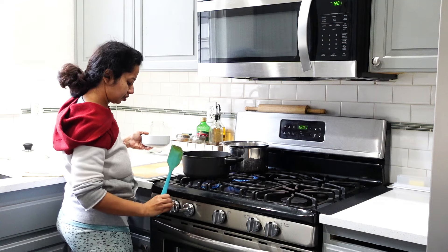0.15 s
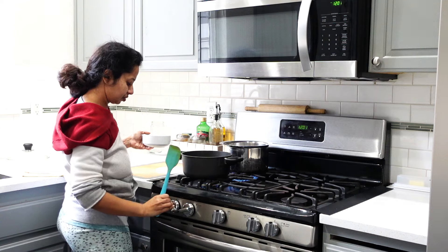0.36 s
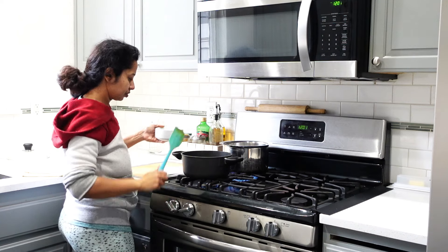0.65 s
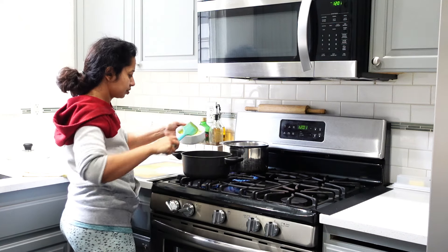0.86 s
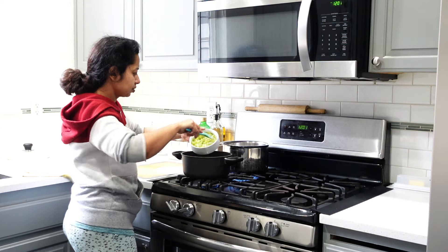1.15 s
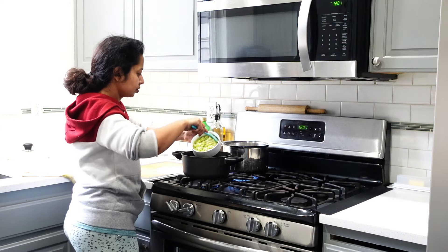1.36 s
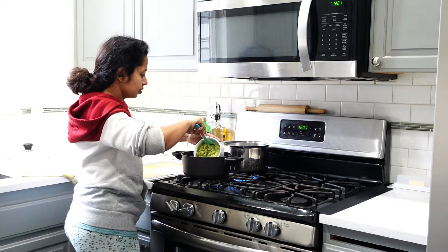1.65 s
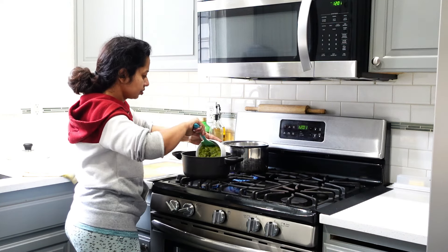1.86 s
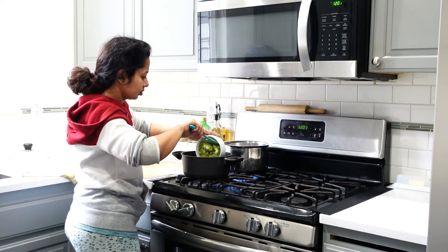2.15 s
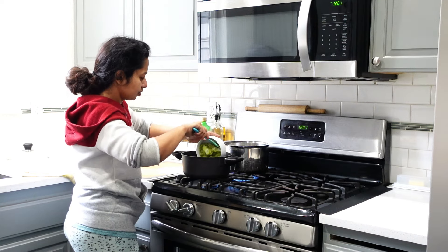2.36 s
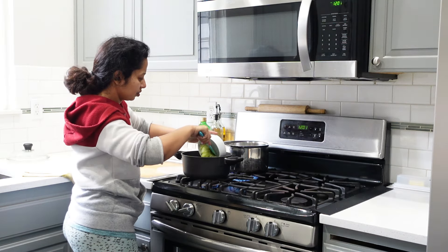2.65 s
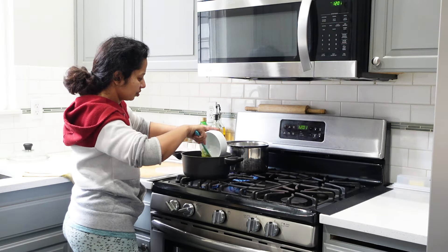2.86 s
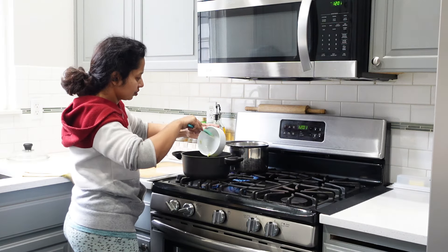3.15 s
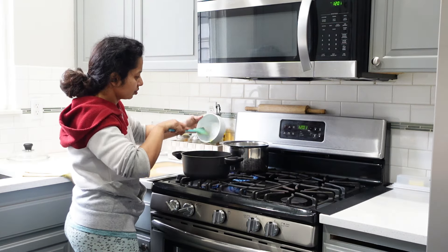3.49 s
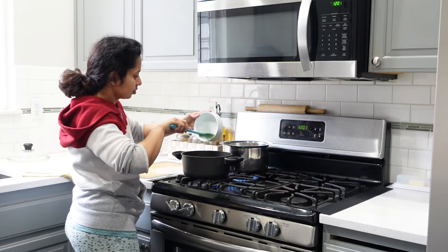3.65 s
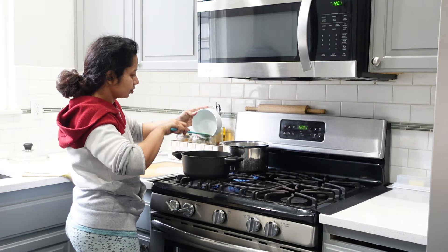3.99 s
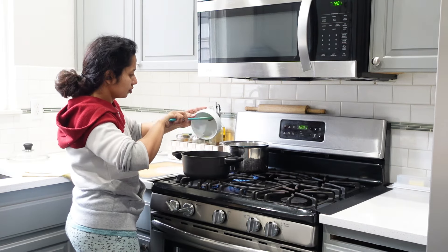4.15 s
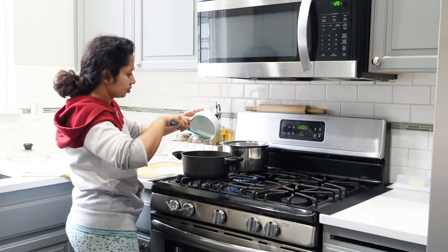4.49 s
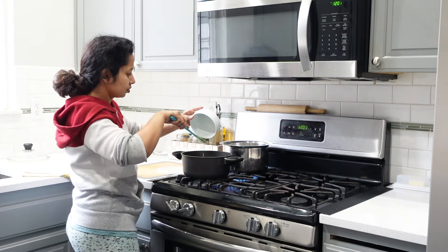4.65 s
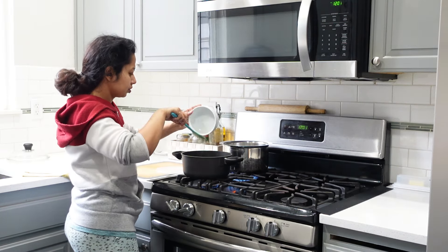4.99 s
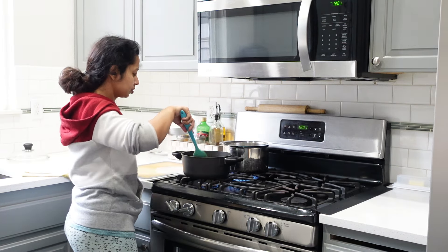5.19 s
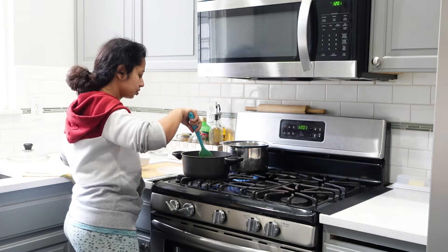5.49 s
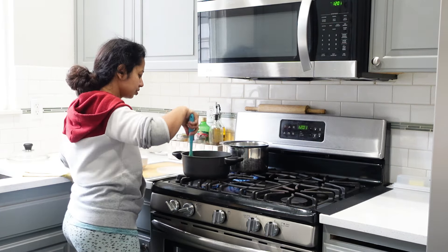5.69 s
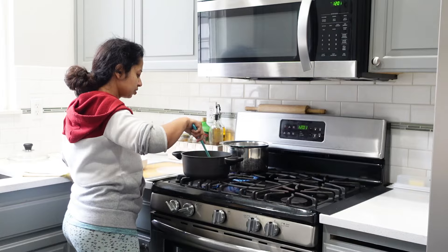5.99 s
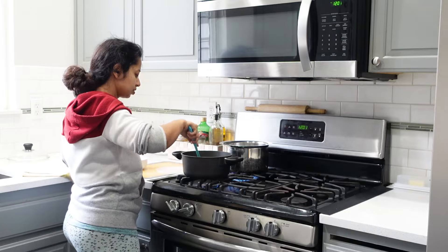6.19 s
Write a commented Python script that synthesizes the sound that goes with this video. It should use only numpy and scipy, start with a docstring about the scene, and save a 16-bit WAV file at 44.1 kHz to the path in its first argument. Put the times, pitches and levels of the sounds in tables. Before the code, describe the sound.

A pot of hot oil on a stove is heard in stereo from a few steps away in a tiled kitchen with short, close reflections. From 0 to 2.5 s the oil simmers thinly, with irregular bright steam spits and sharp snaps, strongest in the first 1.5 s and slowly getting duller. A low appliance hum stops at about 0.2 s; a very faint low murmur and drone remain beneath. At about 2.57 s vegetable paste lands and the level drops abruptly for an instant. The sputter thins, and from 2.7 to 3.3 s a dense, bubbling fizz builds, ringing in the pot with tiny pips. It eases gradually until 5.2 s. Then a rubber spatula rubs the pot and stirring lifts the sizzle brighter and fuller, with a spit at 5.6 s, a rub and soft bump near 5.9 s, and hissing swells until the end at about 6.3 s.

```python
"""Hot oil sputters in a pot on a gas stove, heard from across a tiled kitchen: steam spits are pitched noise puffs in spray.
Vegetable paste is scraped in; the sputter thins out and a dense fizz of random pops builds in the pot's resonances,
swelling when it is stirred. Snaps, short ringing pips, swells of bubbling and hissing, spatula rubs and bumps join in.
A low noise murmur and a narrow-band drone lie beneath; a low appliance hum sounds for the first moment only."""
import sys
import numpy as np
from scipy import signal
from scipy.fft import rfft, irfft, next_fast_len
from scipy.io import wavfile
from scipy.ndimage import map_coordinates

SR = 44100
rng = np.random.default_rng(int(sys.argv[2]) if len(sys.argv) > 2 else 0)


def persist_wave(psi):
    """Save psi, clipped to +-1, as 16-bit WAV."""
    counts = np.round(np.clip(psi, -1, 1) * 32767).astype(np.int16)
    wavfile.write(sys.argv[1], SR, np.atleast_2d(counts).T)


N = 279241
TIME = np.arange(N) / SR
SIZE = next_fast_len(N + SR // 2)
FREQ = np.maximum(np.arange(SIZE // 2 + 1) * SR / SIZE, 1)

SPOTS = 3   # sounding places in the pot
PASTE_IN_S, SPREAD_S = 2.566, 0.79   # the paste lands, then spreads over the hot base
# Resonances of the pot and the air in it. Each row: pitch in Hz, width in Hz,
# boost in dB for the bare oil, mean boost in dB for the paste.
POT_MODES = [(593, 31, 0, 6), (702, 21.5, 6.5, 18), (848, 19, -3.5, 11), (927, 44, 6, 1.5),
             (1342, 40.5, 13, 13), (1570, 99, -0.5, 2.5), (1937, 79, -2, 10), (2097, 48, 8, 0.5),
             (2567, 33, 10, 9), (2912, 38, 4.5, 2), (3080, 56, -2, 0.5), (3420, 43, 8.5, -0.5),
             (3900, 70, 1, 9), (4710, 30, 3, 1), (5480, 110, 4.5, 6), (5870, 150, 6, 2.5)]


def from_db(db):
    """Decibels to gain."""
    return 10 ** (np.asarray(db) / 20)


def rms_one(x):
    """Scale to unit rms."""
    return x / np.sqrt(np.mean(x ** 2) + 1e-20)


def in_time(rows):
    """Each column of a curve, at every sample."""
    s, *columns = np.transpose(rows)
    return [np.interp(TIME, s, c) for c in columns]


def at_hz(points, hz=FREQ):
    """Read a spectrum on a log-frequency axis."""
    f, value = np.transpose(points)
    return np.interp(np.log(hz), np.log(f), value)


def filtered(x, response):
    """Apply a frequency response."""
    return irfft(rfft(np.float32(x), SIZE) * np.complex64(response), SIZE)[..., :N]


def resonance(hz, width_hz):
    """Response of one damped mode, 1 on top."""
    return 1 / (1 + 1j * (FREQ ** 2 - hz ** 2) / (FREQ * width_hz))


def drift(rate):
    """Slow chance with spread 1, wandering up to rate times a second."""
    step = 50   # samples per slow value
    r = np.exp(-2 * np.pi * step * rate / SR)
    noise = rng.standard_normal(N // step + 502)
    slow = rms_one(signal.lfilter([1], [1, -2 * r, r * r], noise)[500:])
    return np.interp(np.arange(N) / step, np.arange(len(slow)), slow)


def until(s):
    """1 up to a moment, then 0 within a few milliseconds."""
    return np.clip((s - TIME) / .003 + .5, 0, 1)


def ramp(start_s, length_s):
    """0 before a moment, then rising evenly to 1."""
    return np.clip((TIME - start_s) / length_s, 0, 1)


def swell(s, width_s):
    """Bell-shaped rise and fall around a moment."""
    return np.exp(-.5 * ((TIME - s) / width_s) ** 2)


def pops(per_s, spread_db):
    """Tiny bubbles of uneven size burst at random moments, per_s at each spot in the pot."""
    born = rng.random((SPOTS, N)) < per_s / SR
    sizes = from_db(spread_db * np.minimum(rng.exponential(1, N), 4))
    signs = rng.choice([-1, 1], (SPOTS, N))
    return rms_one(sizes * signs * born)


def clustered(x, spread_db, rate, count=13):
    """Bubbles of like size burst in clusters, so each narrow band flares on its own."""
    centres_hz = np.geomspace(550, 13500, count)
    place = np.float32(np.interp(np.log(FREQ), np.log(centres_hz), np.arange(count)))
    spectrum, out = rfft(np.float32(x), SIZE), 0
    for k in range(count):
        band = irfft(spectrum * np.maximum(1 - np.abs(place - k), 0), SIZE)[:, :N]
        flare = np.float32(rms_one(from_db(spread_db * drift(rate))))
        out = out + band * flare
    return out


def wavering(x, share, rate):
    """Steam and moving food shift the pot's resonances slightly up and down: playback speed drifts."""
    place = np.arange(N) + share * np.cumsum(drift(rate))
    return np.array([map_coordinates(spot, [place], order=3, mode="mirror") for spot in x])


def pot_response():
    """The nearly empty pot lifts the sound of the oil at its resonances."""
    return np.prod([1 + (from_db(db) - 1) * resonance(hz, width_hz)
                    for hz, width_hz, db, _ in POT_MODES], axis=0)


def oil():
    """Thin simmer of the bare oil: dense pops in the pot, mostly smothered once the paste lands."""
    # Simmer spectrum ahead of the pot. Each row: frequency in Hz, relative density in dB per Hz.
    oil_colour = [(110, -33), (280, -23), (450, -11.5), (600, -14.5), (1000, -9.5), (1650, -12.5),
                  (2450, -8.5), (2900, -0.5), (3300, -5.5), (6500, -4.5), (10000, -6.5), (15500, -11)]
    settled_db, calms_db, calm_s = -44.9, 4, 0.26
    cools_db_per_s, smothered_db = 0.22, -12.5
    level_db = settled_db + calms_db * np.exp(-TIME / calm_s) - cools_db_per_s * TIME
    simmer = pops(per_s=2200, spread_db=3.8) * from_db(1.3 * drift(rate=60))
    simmer = clustered(simmer, spread_db=2.8, rate=30)
    simmer = filtered(simmer, from_db(at_hz(oil_colour)) * pot_response())
    simmer = rms_one(wavering(simmer, share=.012, rate=5))
    bare = until(PASTE_IN_S)
    return simmer * from_db(level_db) * (bare + (1 - bare) * from_db(smothered_db))


def small_spits(count=80):
    """Faint spits at uneven intervals, pausing while the cold paste spreads."""
    per_s, swell_s, jet_share = 4, 0.0024, 0.26
    mean_db, spread_db = -46, 1.5   # ahead of the jet and spray trims
    middle_hz, spread_octaves = 6500, 0.42
    times_s = np.cumsum(rng.uniform(.3, 1.7, count)) / per_s
    sizes, pitches = rng.standard_normal((2, count))
    rows = zip(times_s, middle_hz * 2 ** (spread_octaves * pitches), mean_db + spread_db * sizes)
    return [(s, swell_s, hz, db, jet_share) for s, hz, db in rows
            if s < TIME[-1] and not PASTE_IN_S < s < PASTE_IN_S + SPREAD_S]


def spits(jet_trim_db=-2.5, spray_trim_db=2.0, jet_q=3.44):
    """Water flashes to steam: each puff has a pitch of its own, inside a broad spray of droplets."""
    # The louder spits. Each row: time in seconds (3 ms past the peak), swell in seconds, jet pitch in Hz,
    # level in dB ahead of the trims, share of that power in the jet (0-1).
    loud_spits = [(0.188, 0.017, 5640, -35.5, 0.57), (0.211, 0.0037, 4900, -34, 0.73),
                  (0.282, 0.028, 6800, -37, 0.5), (0.311, 0.0075, 5450, -36.5, 0.76),
                  (0.342, 0.01, 6960, -30.5, 0.82), (.398, 0.014, 8160, -37.5, .8),
                  (.421, 0.0059, 7400, -40, 0.3), (0.479, 0.0033, 4700, -26, 0.98),
                  (0.558, 0.01, 7300, -36, 1), (.592, 0.0078, 7000, -38, 1),
                  (0.633, 0.0041, 7500, -38.5, 0.5), (0.659, 0.01, 7400, -29.5, 0.9),
                  (.675, 0.02, 5000, -37, 0.13), (0.782, 0.0098, 3070, -37, 0.34),
                  (.815, 0.0089, 7500, -37.5, 0.9), (0.863, 0.018, 4150, -37.5, 0.5),
                  (.904, 0.014, 6000, -34.5, 0.63), (0.941, 0.013, 6130, -33.5, 0.4),
                  (.968, 0.0095, 5000, -40, 0), (1.005, 0.024, 6950, -41, 0.87),
                  (1.065, 0.019, 8600, -37, 0.92), (1.113, .004, 6100, -37, 1),
                  (1.19, 0.0046, 8500, -38, 0.4), (1.214, 0.01, 5330, -30, 0.93),
                  (1.275, 0.0033, 3500, -38, 0.67), (1.335, 0.0044, 5340, -27.5, 1),
                  (1.364, 0.0047, 2140, -36, 0.45), (1.471, 0.0035, 9300, -32, 0.9),
                  (1.504, 0.0035, 8040, -39.5, 0.7), (1.556, 0.0065, 5500, -41.5, 0.96),
                  (1.616, 0.0041, 7650, -34, 0.97), (1.636, .004, 6500, -45, 0.3),
                  (1.68, 0.024, 5300, -39, 0.3), (1.712, 0.012, 5560, -37, .3),
                  (1.8, 0.016, 7500, -47, 0.1), (1.84, 0.0054, 9500, -42, 0.5),
                  (1.868, 0.0087, 6890, -40.5, 0.2), (1.937, 0.01, 5800, -33, 0.93),
                  (1.982, 0.005, 5800, -40.5, 0), (2.047, 0.0068, 6300, -37.5, 0.7),
                  (2.106, .005, 5850, -36, 0.55), (2.126, 0.002, 8000, -33.5, 0.4),
                  (2.16, .006, 7550, -42, 0.5), (2.186, 0.004, 4300, -36, 0.5),
                  (2.275, 0.0033, 5800, -34, 0.9), (2.332, 0.027, 8450, -36, 0.86),
                  (2.388, 0.0089, 5560, -32, 0.79), (2.41, 0.0043, 9000, -38, 0.7),
                  (2.462, 0.0044, 10100, -37, 0.5), (2.484, 0.0072, 5500, -39, 0),
                  (2.552, 0.03, 3900, -37, 0.26), (2.592, 0.0046, 5500, -37, 0.1),
                  (2.822, 0.0039, 4970, -40, 0.84), (2.859, 0.013, 3550, -42.5, 1),
                  (3.093, 0.0054, 3700, -35.5, 1), (4.261, 0.031, 4500, -39.5, 0.64),
                  (5.606, 0.0059, 3700, -32, 1), (6.195, 0.0033, 7500, -34, 0.5)]
    # Droplet spectrum. Each row: frequency in Hz, relative density in dB per Hz.
    spray_colour = [(120, -52), (400, -17), (1300, -13.5), (2000, -7), (3000, 1), (5500, 0), (8500, 0),
                    (12000, -3), (15500, -5.5)]
    jets, spray_power = np.zeros((SPOTS, N)), np.zeros(N)
    for s, swell_s, hz, db, jet_share in [*loud_spits, *small_spits()]:
        jet_share = np.clip(jet_share, 0, 1)
        span = slice(max(int((s - .08) * SR), 0), int((s + .2) * SR))
        t = TIME[span] - s + .003
        swell_s = max(swell_s, .001)
        fade_s = .005 + .5 * swell_s
        # the puff swells, then dies as the drop is used up
        puff = np.where(t < 0, np.exp(-.5 * (t / swell_s) ** 2), np.exp(-np.abs(t) / fade_s))
        b, a = signal.iirpeak(min(hz, SR / 3), jet_q, fs=SR)
        steam = signal.lfilter(b, a, rng.standard_normal((SPOTS, SR // 3)))
        steam = rms_one(signal.lfilter(b, a, steam)[:, -len(t):])
        jets[:, span] += from_db(db + jet_trim_db) * np.sqrt(jet_share) * puff * steam
        spray_power[span] += (1 - jet_share) * (from_db(db + spray_trim_db) * puff) ** 2
    spray = clustered(pops(per_s=2400, spread_db=3.2), spread_db=2.3, rate=25)
    spray = rms_one(filtered(spray, from_db(at_hz(spray_colour))))
    return jets + spray * np.sqrt(spray_power)


def dulled(x, from_s=0.72, dull_hz=12000):
    """The bare oil's sputter slowly grows duller: a low-pass fades in."""
    faded_in = ramp(from_s, PASTE_IN_S - from_s)
    dull = filtered(x, 1 / np.sqrt(1 + (FREQ / dull_hz) ** 4))
    return x + faded_in * (dull - x)


def hum(rumble_db=-51, side_db=-12):
    """Motor and mains tones over a soft rumble, stopping short."""
    # Steady tones. Each row: frequency in Hz, level in dB rms.
    hum_tones = [(53.5, -46.5), (102.3, -59), (119.5, -48), (127, -56), (146, -62), (190, -62.5),
                 (242, -64), (318, -64), (364, -63)]
    # Rumble spectrum. Each row: frequency in Hz, relative density in dB per Hz.
    rumble_colour = [(20, -13), (60, -31), (130, -2.5), (350, 0.5), (470, -5), (750, -4), (1150, -9),
                     (2000, -17), (3500, -18.5)]
    end_s = .19
    tones = sum(from_db(db) * np.sqrt(2) * np.sin(2 * np.pi * (hz * TIME + rng.random()))
                for hz, db in hum_tones)
    mid, side = rms_one(filtered(rng.standard_normal((2, N)), from_db(at_hz(rumble_colour))))
    rumble = mid + from_db(side_db) * np.array([side, -side])
    return (tones + from_db(rumble_db) * rumble) * until(end_s)


def murmur(trim_db=3.5):
    """Low murmur: faint noise of uneven level."""
    # Level curve. Each row: time in seconds, level in dB ahead of the trim and drift.
    murmur_level = [(0.4, -105), (1.0, -81), (2.2, -81), (2.7, -89), (3.7, -87.5), (4.15, -99),
                    (4.5, -92.5), (6.1, -91)]
    # Murmur spectrum. Each row: frequency in Hz, relative density in dB per Hz.
    murmur_colour = [(40, -36), (110, -36), (150, -1.5), (180, 3), (240, -2.5), (330, 2), (430, -36),
                     (600, -11), (1500, -29)]
    level_db, = in_time(murmur_level)
    level_db = level_db + trim_db + 3 * drift(rate=7)
    noise = rms_one(filtered(rng.standard_normal((2, N)), from_db(at_hz(murmur_colour))))
    return from_db(level_db) * noise


def drone(hz=177.4, width_hz=49):
    """A low, faint drone of narrow-band noise that dies away."""
    # Level curve. Each row: time in seconds, level in dB.
    drone_level = [(.4, -89), (1.4, -80.5), (2.2, -83), (3.3, -83), (3.75, -87), (4.1, -105)]
    level_db, = in_time(drone_level)
    tone = rms_one(filtered(rng.standard_normal((2, N)), resonance(hz, width_hz) ** 2))
    return from_db(level_db) * tone


def crackle(per_s=39, faint_db=-55.5):
    """Water drops burst in the bare oil with single sharp snaps, the fainter ones at random."""
    # The louder snaps. Each row: time in seconds, impulse height in dB ahead of the colouring.
    loud_snaps = [(0.476, -11), (0.654, -12), (0.902, -22), (1.060, -19), (1.208, -14), (1.331, -24),
                  (1.612, -22), (1.934, -15), (2.048, -27), (2.100, -22), (2.124, -19), (2.274, -19),
                  (2.380, -25)]
    # Snap spectrum. Each row: frequency in Hz, gain in dB.
    snap_colour = [(300, -46), (2000, -10), (4000, 8), (6000, -12), (10000, 0), (15500, -12)]
    clicks = pops(per_s=per_s / SPOTS, spread_db=6.5) * from_db(faint_db) * until(PASTE_IN_S)
    for k, (s, db) in enumerate(loud_snaps):
        clicks[k % SPOTS, int(s * SR)] += from_db(db)
    return filtered(clicks, from_db(at_hz(snap_colour)))


def swells(q=5.1, uneven_db=4.5, uneven_per_s=12):
    """Brief swells of bubbling and hissing at low to high pitches, uneven, some while stirring."""
    # Each row: time of the height in seconds, swell in seconds, pitch in Hz, level in dB at the height.
    swell_rows = [(.96, 0.063, 440, -63.5), (1.19, 0.035, 450, -61), (3.03, 0.083, 1300, -51.5),
                  (3.22, 0.15, 2340, -51), (3.28, 0.11, 1337, -48), (3.38, 0.041, 880, -57),
                  (3.77, 0.05, 1330, -49.5), (5.45, 0.086, 2080, -50.5), (5.67, 0.1, 1336, -48.5),
                  (6.1, 0.17, 807, -55), (5.68, 0.067, 3570, -44.5), (5.83, .02, 9200, -42),
                  (6.0, 0.029, 4830, -43), (6.08, .04, 2034, -48), (6.29, 0.036, 3750, -37.5)]
    bubbles = pops(per_s=860, spread_db=3.0) * from_db(uneven_db * drift(uneven_per_s))
    return sum(rms_one(filtered(bubbles, resonance(hz, hz / q) ** 2)) * from_db(db) * swell(s, swell_s)
               for s, swell_s, hz, db in swell_rows)


def boil_levels():
    """Level in dB of each bubble size: up as the paste heats, down as it dries, up again when it is stirred."""
    # Large, middling and fine bubbles. Each row: level in dB once spread, dB lower on landing,
    # wait in seconds before the boil-up, boil-up time in seconds, dB gained by stirring.
    bubble_sizes = [(-48.5, 18, 0.1, 0.58, 3), (-46.2, 11.5, 0.057, 0.42, 5), (-50.5, 7, 0.36, 0.34, 7.5)]
    dries_db_per_s = 1.02
    # stirring brings wet paste down onto the hot base
    stir_s, stir_rise_s, stir_builds_db_per_s = 5.24, 0.42, 4.5
    lags_s = (0, 0, 0.025)   # the finest hiss follows the stirring a little late
    wet_db = (-dries_db_per_s * np.maximum(TIME - PASTE_IN_S - SPREAD_S, 0)
              + stir_builds_db_per_s * np.maximum(TIME - stir_s, 0))
    levels = []
    for (db, landing_db, wait_s, rise_s, stir_db), lag_s in zip(bubble_sizes, lags_s):
        cold = 1 - ramp(PASTE_IN_S + wait_s, rise_s)
        stirred = ramp(stir_s + lag_s, stir_rise_s)
        levels.append(db + wet_db - landing_db * cold + stir_db * stirred)
    return levels


def pot_ringing(x, waver_db=3.5, wavers_per_s=6):
    """As the paste shifts about, each resonance of the pot comes and goes on its own."""
    spectrum, out = rfft(np.float32(x), SIZE), x
    for hz, width_hz, _, db in POT_MODES:
        ring = irfft(spectrum * np.complex64(resonance(hz, width_hz)), SIZE)[:, :N]
        out = out + ring * (from_db(db) - 1) * rms_one(from_db(waver_db * drift(wavers_per_s)))
    return out


def paste(flutter_db=1.0, flutters_per_s=10):
    """Water boils out of the paste: dense pops ring in the pot, low, middle and high bands boiling up apart."""
    # Fizz spectrum ahead of the pot. Each row: frequency in Hz, relative density in dB per Hz.
    paste_colour = [(120, -60), (400, -31.5), (540, -20.5), (620, -15), (800, -12.5), (1020, -10),
                    (1220, -3), (1450, -4.5), (1670, -4.5), (2200, -2.5), (2420, -3.5), (3000, 2),
                    (4000, 0), (6300, -3.2), (9500, -5), (12000, -8), (15500, -13.5)]
    bubble_top_hz, fizz_top_hz = 2300, 6500
    above_bubbles, above_fizz = (1 / (1 + (hz / FREQ) ** 8) for hz in (bubble_top_hz, fizz_top_hz))
    shares = [1 - above_bubbles, above_bubbles * (1 - above_fizz), above_fizz]
    grains = pops(per_s=4500, spread_db=3.2) * from_db(.5 * drift(rate=45))
    grains = clustered(grains, spread_db=3.0, rate=16, count=20)
    grains = pot_ringing(filtered(grains, from_db(at_hz(paste_colour))))
    grains = wavering(grains, share=.011, rate=9)
    out = 0
    for share, level_db, uneven in zip(shares, boil_levels(), (1, .5, .5)):   # large bubbles flutter most
        level_db = level_db + uneven * flutter_db * drift(flutters_per_s)
        out = out + rms_one(filtered(grains, np.sqrt(share))) * from_db(level_db)
    return out * (1 - until(PASTE_IN_S))


def dip(depth_db=-16, recover_s=0.038):
    """The level drops abruptly at one moment, then comes back within about a tenth of a second."""
    since_s = np.maximum(TIME - PASTE_IN_S, 0)
    return from_db(depth_db * (1 - until(PASTE_IN_S)) * np.exp(-since_s / recover_s))


def pings(ring_cycles=24, spread_db=3):
    """Short ringing pips at random moments, each a decaying sine at a pitch of its own."""
    # Spells of pips. Each row: start in seconds, end in seconds, pips per second,
    # lowest pitch in Hz, highest pitch in Hz, level in dB rms over the spell ahead of the high-pass.
    ping_spells = [(2.601, 2.7, 65, 2975, 10400, -57), (2.95, 6.1, 210, 1799, 7494, -51.5),
                   (5.4, 6, 260, 1900, 9970, -44.5)]
    out, t = np.zeros((SPOTS, N)), TIME[:SR // 25]
    for start_s, end_s, per_s, low_hz, high_hz, db in ping_spells:
        length_s = end_s - start_s
        layer = np.zeros((SPOTS, N + SR))
        for when, pitch, size, spot in rng.random((1000, 4))[:int(per_s * length_s)]:
            hz = low_hz * (high_hz / low_hz) ** pitch
            i = max(int((start_s + when * length_s) * SR), 0)
            gain = from_db(spread_db * min(-np.log(1 - size), 3))
            ring = np.sin(2 * np.pi * hz * t) * np.exp(-hz * t / ring_cycles)
            layer[int(spot * SPOTS), i:i + len(t)] += gain * ring
        out += from_db(db) * np.sqrt(length_s / TIME[-1]) * rms_one(layer[:, :N])
    return filtered(out, 1 / (1 + (900 / FREQ) ** 4))


def spatula(q=9):
    """The rubber blade rubs on the pot: bursts of random slips through one resonance each."""
    # Rubs. Each row: time of the height in seconds, swell in seconds, pitch in Hz, level in dB at the height.
    rubs = [(5.264, 0.0044, 3880, -37), (5.877, 0.0094, 820, -46), (5.901, 0.02, 3060, -43)]
    slips = pops(per_s=2500, spread_db=2)
    return sum(rms_one(filtered(slips, resonance(hz, hz / q) ** 2)) * from_db(db) * swell(s, swell_s)
               for s, swell_s, hz, db in rubs)


def pushes():
    """Dull, soft bumps of the spatula pushing the paste against the pot: swells of low-pitched pops."""
    # Bumps. Each row: time of the height in seconds, swell in seconds, level in dB at the height.
    bumps = [(5.712, .03, -81), (5.921, 0.031, -67), (6.207, 0.07, -77)]
    # Bump spectrum. Each row: frequency in Hz, relative density in dB per Hz.
    push_colour = [(40, -12), (120, -9), (300, -5), (480, 7), (700, -8), (1200, -17)]
    body = rms_one(filtered(pops(per_s=600, spread_db=2), from_db(at_hz(push_colour))))
    return body * sum(from_db(db) * swell(s, swell_s) for s, swell_s, db in bumps)


def kitchen(x, early_t60_s=0.061, late_t60_s=0.4, late_db=-14, evenness=0.79):
    """The pot wall hides the direct sound: each side hears its own dense reflections, near tiles, then the room."""
    t = TIME[:SR // 2]
    fading = from_db(-60 * t / early_t60_s) + from_db(late_db - 60 * t / late_t60_s)
    paths = rfft(rng.standard_normal((2, SPOTS, len(t))) * fading, SR)   # microphone side, spot in the pot
    # each side's reflections are partly flattened in spectrum, so no pitch stands out too much
    overall = np.linalg.norm(paths, axis=1, keepdims=True)
    echoes = irfft(paths / overall ** min(evenness, 1), SR)[..., :len(t)]
    echoes /= np.linalg.norm(echoes, axis=(1, 2), keepdims=True)
    return filtered(x, rfft(echoes, SIZE)).sum(axis=1)


def scene():
    """Everything in the pot goes through the kitchen; hum, murmur and drone are added directly."""
    # Stereo balance of the pot. Each row: frequency in Hz, left minus right in dB.
    balance = [(330, 2.5), (770, -.3), (1400, -1.5), (2740, -0.5), (5600, -1.5), (9810, 0), (15000, 0.5)]
    sputter = dulled(oil() + spits()) + crackle()
    food = swells() + paste() + pings() + spatula() + pushes()
    pot = kitchen(sputter + food) * dip()
    sides = from_db(at_hz(balance) * np.array([[.5], [-.5]]))
    return filtered(pot, sides) + hum() + murmur() + drone()


def record(dry, cutoff_hz=15800):
    """The top is cut steeply, over the last 400 Hz below the cutoff."""
    return filtered(dry, np.clip((cutoff_hz - FREQ) / 400, 0, 1))


dry = scene()
out = record(dry)
persist_wave(out)
```